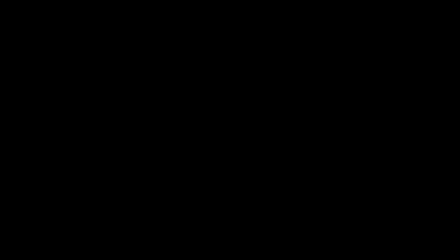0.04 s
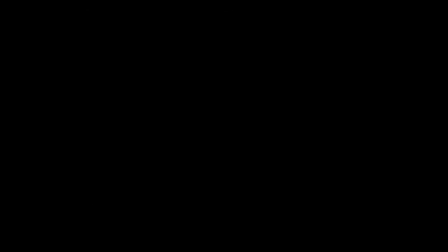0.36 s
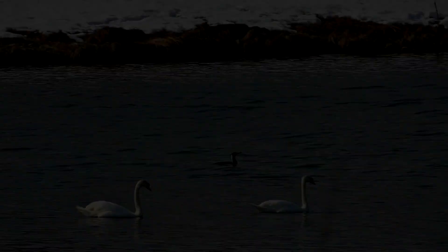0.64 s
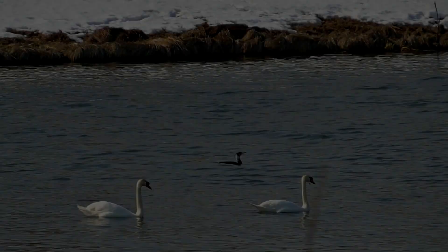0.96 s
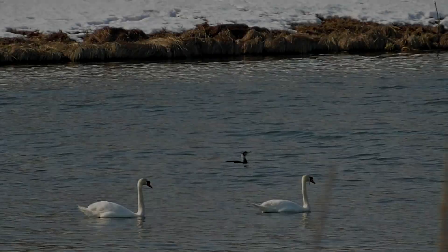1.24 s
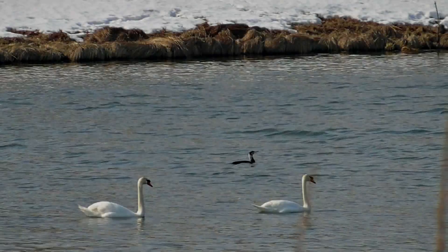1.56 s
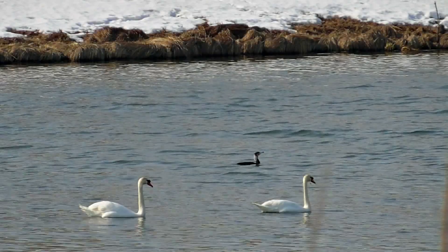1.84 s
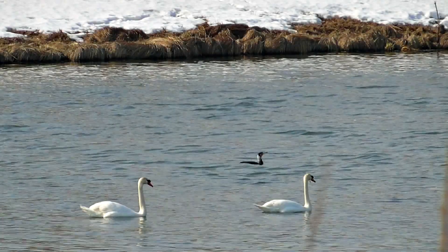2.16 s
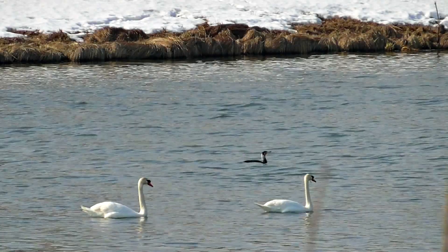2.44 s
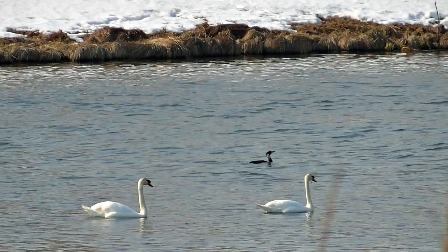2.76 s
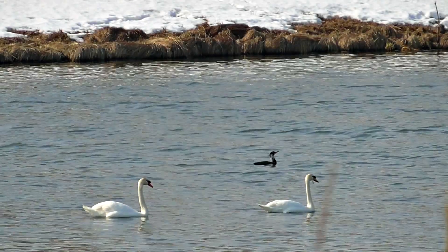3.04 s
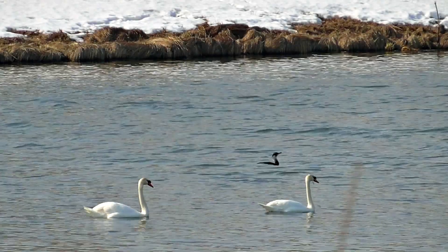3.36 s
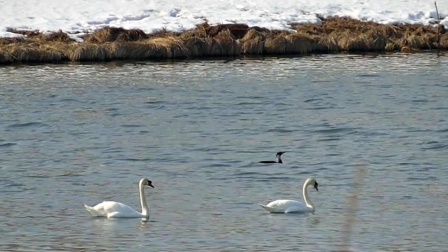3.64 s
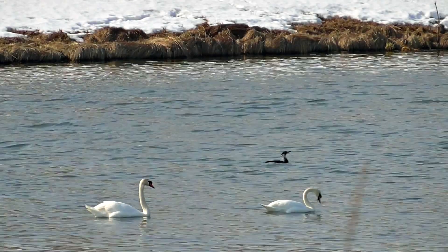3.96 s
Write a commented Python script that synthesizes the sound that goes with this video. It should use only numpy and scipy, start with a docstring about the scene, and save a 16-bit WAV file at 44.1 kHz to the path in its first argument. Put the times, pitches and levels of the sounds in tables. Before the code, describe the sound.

A low wind rumble fades in over open water and gently buffets a stereo microphone. A soft rush and fine hiss of air and ripples run underneath, with a small gust near the end.

```python
"""A low rumble of wind fades in over open water, heard through a stereo camera microphone.
It swells with the gusts, while eddies buffet each of the two microphone ports on its own.
Air and rippled water make a rush and a fine hiss, and a faint low drone lies underneath.
A few soft swishes rise out of the rush."""
import sys
import numpy as np
from scipy import signal
from scipy.fft import rfft, irfft, next_fast_len
from scipy.io import wavfile
from scipy.ndimage import uniform_filter1d, map_coordinates

SR = 44100
rng = np.random.default_rng(int(sys.argv[2]) if len(sys.argv) > 2 else 0)


def output_pcm(signal):
    """Save a mono or channel-first signal as 16-bit PCM at the path in sys.argv[1].

    Samples are clipped to [-1, 1] before scaling.
    """
    pcm = np.clip(np.atleast_2d(signal).T, -1, 1) * 32767
    wavfile.write(sys.argv[1], SR, np.round(pcm).astype(np.int16))


N = 176400
TIME_S = np.arange(N) / SR


def amp(db):
    """Decibels to gain."""
    return 10 ** (np.asarray(db) / 20)


def unit(x):
    """Normalise to rms 1."""
    return x / np.sqrt(np.mean(x ** 2) + 1e-20)


def along(points, hz):
    """Read (f/Hz, value) points on a log frequency axis; a plain number holds everywhere."""
    if np.ndim(points) == 0:
        return np.full(len(hz), float(points))
    point_hz, values = np.transpose(points)
    return np.interp(np.log(hz + 1), np.log(point_hz + 1), values)


def envelope(points):
    """Join (t/s, value) breakpoints with straight ramps."""
    return np.interp(TIME_S, *np.transpose(points))


def wobble(rate_hz):
    """A smooth random modulator that passes through rate_hz random values a second."""
    return map_coordinates(rng.standard_normal(1024), [TIME_S * rate_hz], mode="wrap")


def filtered(x, response):
    """Zero-phase EQ; response gives the gain at each frequency."""
    size = next_fast_len(N + SR // 2)
    return irfft(rfft(x, size) * response(np.fft.rfftfreq(size, 1 / SR)), size)[..., :N]


def patchy_noise(depth_db):
    """Two white noises with patches of random gain, some 500 Hz by 80 ms."""
    spectrogram = signal.stft(rng.standard_normal((2, N)), nperseg=512)[2]
    patches = rng.standard_normal(spectrogram.shape[1:])
    patches = uniform_filter1d(patches, size=6, axis=0)  # smear in frequency
    patches = uniform_filter1d(patches, size=14, axis=1)  # smear in time
    return signal.istft(spectrogram * amp(depth_db * unit(patches)), nperseg=512)[1][:, :N]


def stereo(noises, gain, correlation):
    """EQ two unrelated noises as mid and side of an rms 1 pair; lower correlation is wider."""
    def mid_side_gains(hz):
        angle = np.arccos(np.clip(along(correlation, hz), -1, 1)) / 2
        return gain(hz) * np.array([np.cos(angle), np.sin(angle)])
    mid, side = filtered(noises, mid_side_gains)
    return unit(np.array([mid + side, mid - side]))


def turbulence(eq, correlation, patchy_db):
    """Stereo flow noise of rms 1, coloured by an EQ curve."""
    return stereo(patchy_noise(patchy_db), lambda hz: amp(along(eq, hz)), correlation)


# gust envelope behind the rumble and the buffeting: t/s, level/dB
GUSTS = [(.1, -31.5), (.28, -30), (.39, -30.5), (.445, -27), (.53, -29.5), (.64, -28), (.72, -30),
         (.86, -33), (.99, -33), (1.05, -33), (1.14, -35.5), (1.36, -35.5), (1.52, -37), (1.6, -35.5),
         (1.66, -38), (1.88, -36.5), (2.0, -38.5), (2.33, -38.5), (2.44, -37), (2.55, -38.5), (2.73, -40),
         (3.0, -38), (3.07, -36), (3.17, -35.5), (3.29, -35), (3.35, -36.5), (3.4, -32), (3.48, -35),
         (3.54, -37), (3.62, -36), (3.78, -39.5), (3.89, -34.5), (4.0, -41)]
# deep, round tone of the rumble: f/Hz, level/dB
RUMBLE_EQ = [(20, -29), (38, -22.5), (52, -12), (72, -8.5), (100, -3), (130, 0), (215, 1), (265, -3),
             (330, -4.5), (430, -13), (560, -20.5), (1000, -31.5), (3000, -71)]
# tone of the eddies at the ports, sub-bass to low mids: f/Hz, level/dB
BUFFET_EQ = [(10, -14), (25, -3.5), (42, 1), (65, 1), (100, 3), (170, 2), (400, 1), (650, -7.5),
             (1200, -17.5), (4000, -49)]
def wind(trim_db=-0.53, flutter_db=0.02, buffet_db=-43.5, buffet_follow=0.48, lumps_db=1.0):
    """The gusts drive a rumble common to both ports and the eddies that buffet each alone."""
    gust_db = envelope(GUSTS)
    rumble_gain = amp(gust_db + trim_db - flutter_db * wobble(18))
    rumble = rumble_gain * turbulence(RUMBLE_EQ, correlation=0.96, patchy_db=0.05)
    swing_db = buffet_follow * (gust_db - gust_db.mean())
    eddies_db = lumps_db * np.array([wobble(20), wobble(15)])  # left, right
    buffet = amp(buffet_db + swing_db + eddies_db) * turbulence(BUFFET_EQ, correlation=0, patchy_db=0)
    return rumble + buffet


# swells of the rush of air and water: t/s, level/dB
RUSH_SWELLS = [(.1, -42), (.25, -41.5), (.4, -42.5), (.62, -40.7), (.78, -42.5), (.9, -43.5), (1.01, -43.5),
               (1.16, -49), (1.28, -48), (1.33, -47), (1.4, -45), (1.5, -47), (1.56, -48), (1.65, -49.7),
               (1.88, -50), (1.96, -49), (2.17, -50), (2.37, -49.5), (2.44, -48.5), (2.52, -49.5),
               (2.75, -50), (2.96, -53), (3.1, -51), (3.24, -47.5), (3.39, -48.5), (3.48, -49.5),
               (3.56, -50), (3.82, -50), (3.88, -47), (3.93, -49), (4.0, -49)]
# midrange body of the rush: f/Hz, level/dB
RUSH_EQ = [(150, -13.5), (450, -2), (740, 0), (1200, -4.5), (1600, -9), (2200, -13.5), (3200, -23),
           (5000, -30.5), (9000, -41), (15000, -57)]
# stereo image of the rush, widest in the treble: f/Hz, left-right correlation
RUSH_IMAGE = [(400, 0.47), (1000, 0.53), (2200, 0.34), (5000, 0.16)]
# airy tone of the hiss: f/Hz, level/dB
HISS_EQ = [(300, -3), (1500, 4.5), (3000, 3), (5000, -5), (8000, -9.5), (11000, -16), (15000, -31)]
def air_and_water(flutter_db=0.13, hiss_db=-62.5, hiss_follow=0.065):
    """Moving air and rippled water make a swelling rush and a wide hiss that hardly moves."""
    swell_db = envelope(RUSH_SWELLS)
    rush = amp(swell_db + flutter_db * wobble(13)) * turbulence(RUSH_EQ, RUSH_IMAGE, patchy_db=0.75)
    swing_db = hiss_follow * (swell_db - swell_db.mean())
    hiss = amp(hiss_db + swing_db) * turbulence(HISS_EQ, correlation=0.01, patchy_db=0.5)
    return rush + hiss


def drone(centre_hz=76.4, half_width_hz=2.9, level_db=-48):
    """A band of deep noise, so narrow that it wavers like an unsteady hum."""
    band = lambda hz: 1 / (1 + ((hz - centre_hz) / half_width_hz) ** 2)
    return amp(level_db) * stereo(rng.standard_normal((2, N)), band, correlation=0.91)


# swish cues, each a bell-shaped swell: peak t/s, half length/s, level/dB
SWISH_CUES = [(0.513, 0.025, -54), (0.627, 0.019, -52.5), (0.688, 0.022, -56), (0.749, 0.028, -53.5),
              (2.855, 0.028, -63), (3.348, 0.062, -62.5), (3.68, 0.069, -65.5)]
# bright tone of the swishes: f/Hz, level/dB
SWISH_EQ = [(600, -22), (1500, 5), (2500, 7), (4000, -1.5), (5700, -7), (7000, -16), (14000, -37)]
def swishes():
    """Brief bright swells, like dry grass brushed by the wind."""
    swells = sum(amp(level_db) * np.exp(-.5 * ((TIME_S - peak_s) / half_s) ** 2)
                 for peak_s, half_s, level_db in SWISH_CUES)
    return swells * turbulence(SWISH_EQ, correlation=0.55, patchy_db=2)


# tonal balance of the microphone ports: f/Hz, left minus right level/dB
PORT_BALANCE = [(30, 4), (80, 1.2), (170, 0.6), (240, -0.5), (340, 3.5), (480, -2.5), (600, -0.5),
                (900, -3), (1200, -0.5), (1800, 1.3), (3400, 0.5), (5500, 1), (9000, -.4)]
def microphone_ports(sound):
    """Each port has its own colour: half the balance curve goes left, its inverse goes right."""
    return filtered(sound, lambda hz: amp(np.outer([.5, -.5], along(PORT_BALANCE, hz))))


def scene():
    """Mix all the layers and pass them through the two ports."""
    return microphone_ports(wind() + air_and_water() + drone() + swishes())


def record(dry, fade_start_s=0.078, fade_length_s=1.82, top_hz=15400):
    """A linear fade-in from silence, then the camera's band limit."""
    fade = np.clip((TIME_S - fade_start_s) / fade_length_s, 0, 1)
    return filtered(dry * fade, lambda hz: hz < top_hz)


dry = scene()
out = record(dry)
output_pcm(out)
```